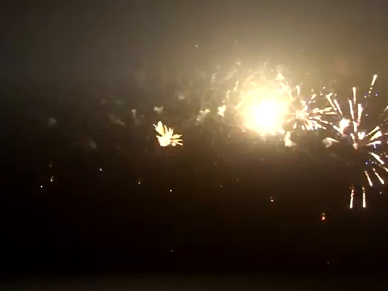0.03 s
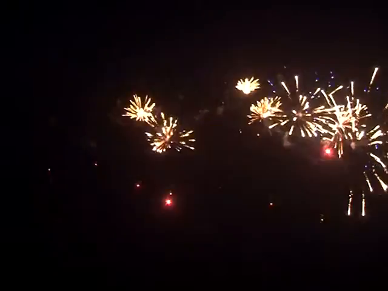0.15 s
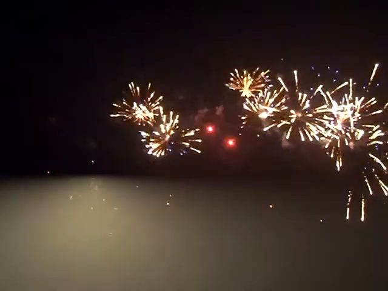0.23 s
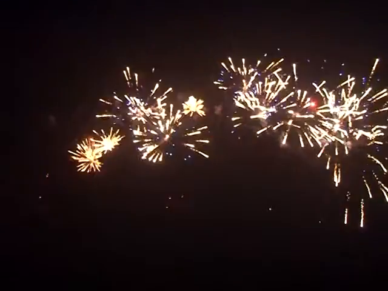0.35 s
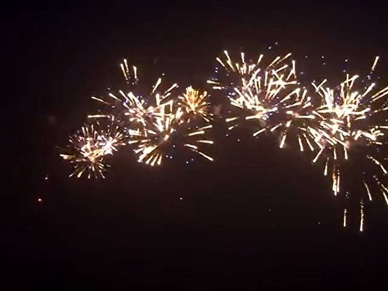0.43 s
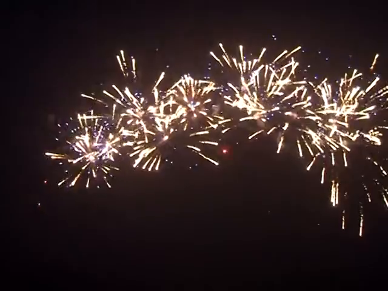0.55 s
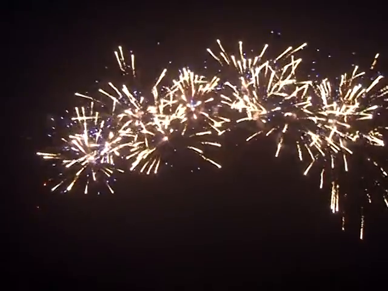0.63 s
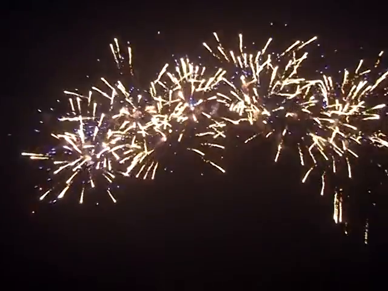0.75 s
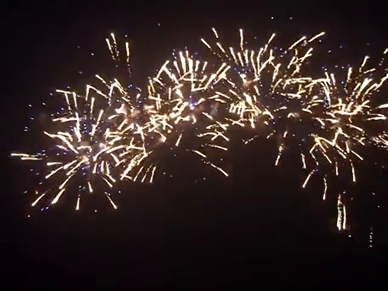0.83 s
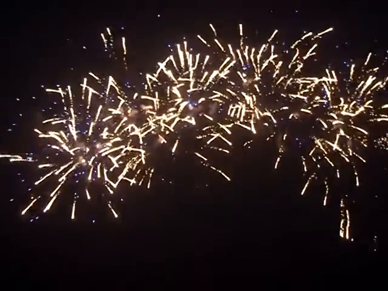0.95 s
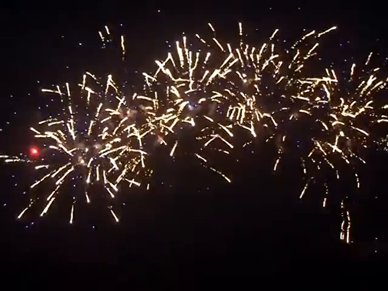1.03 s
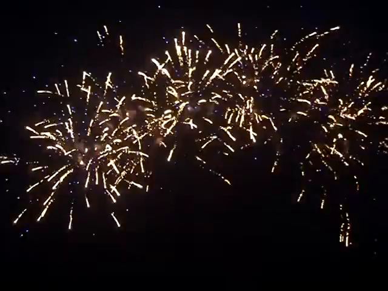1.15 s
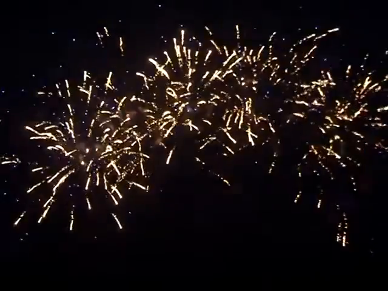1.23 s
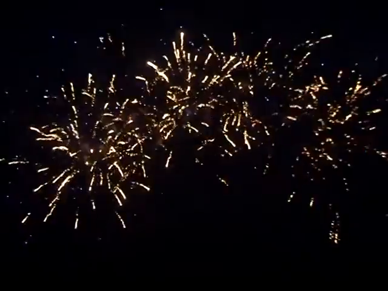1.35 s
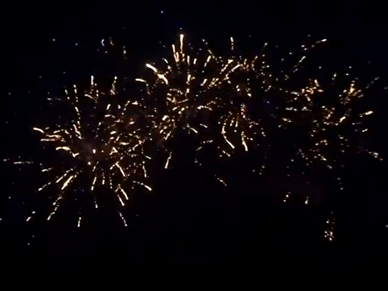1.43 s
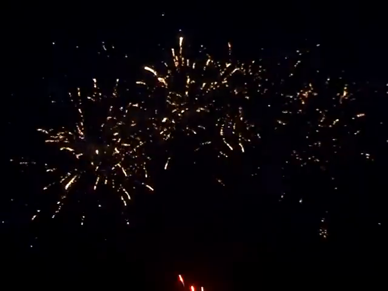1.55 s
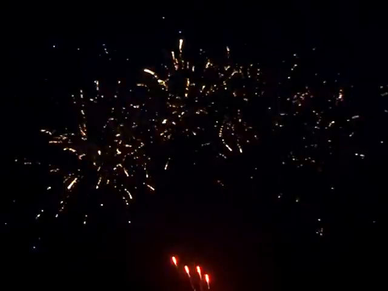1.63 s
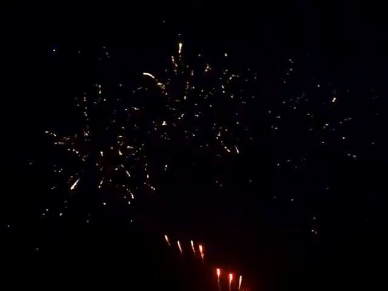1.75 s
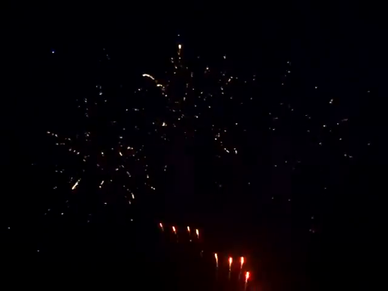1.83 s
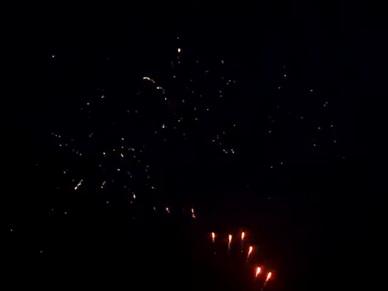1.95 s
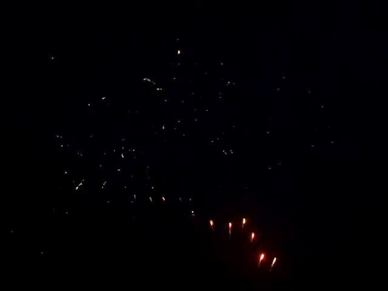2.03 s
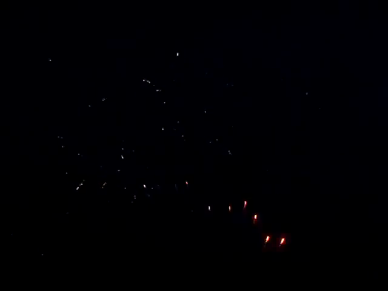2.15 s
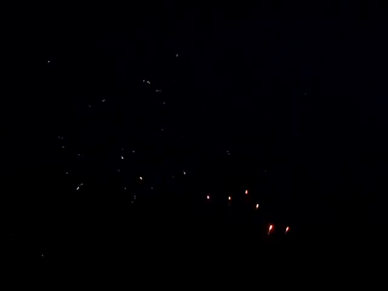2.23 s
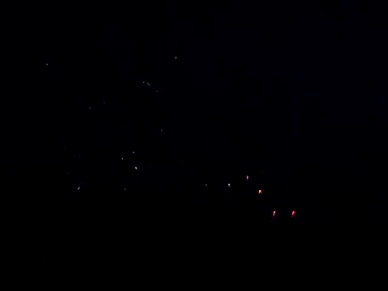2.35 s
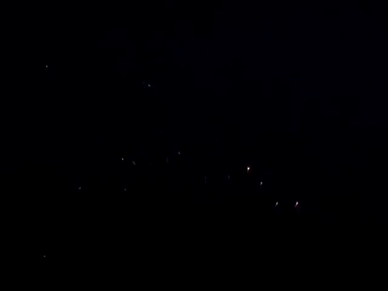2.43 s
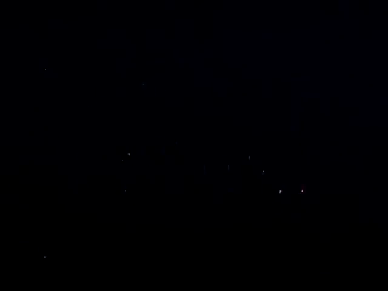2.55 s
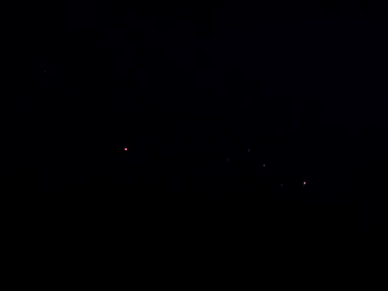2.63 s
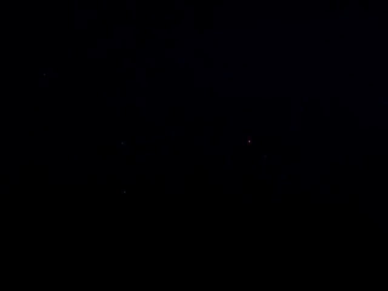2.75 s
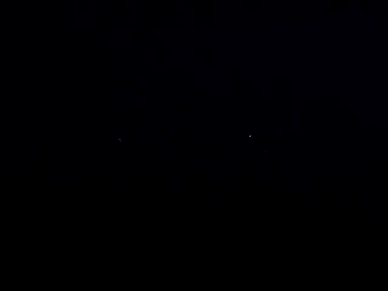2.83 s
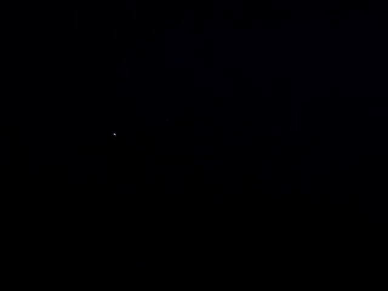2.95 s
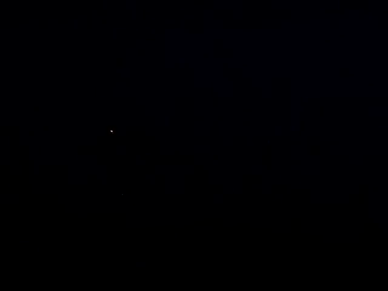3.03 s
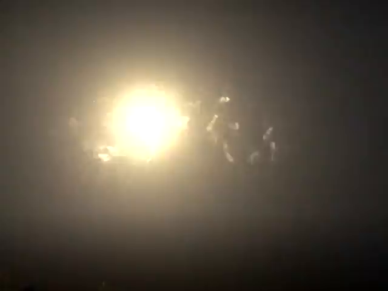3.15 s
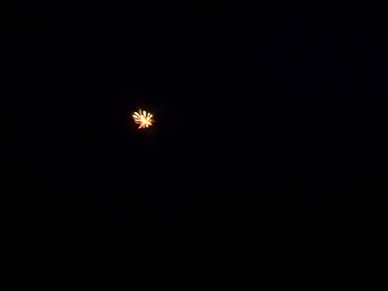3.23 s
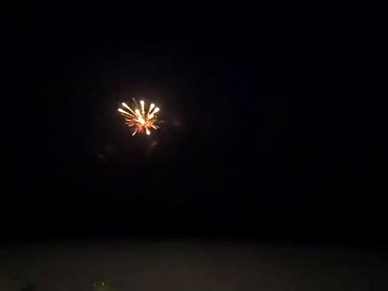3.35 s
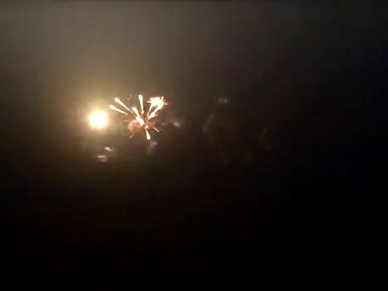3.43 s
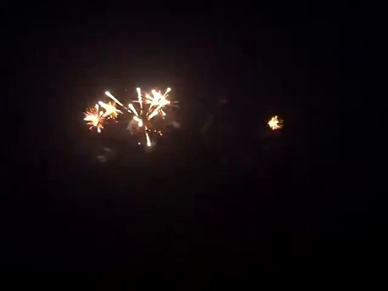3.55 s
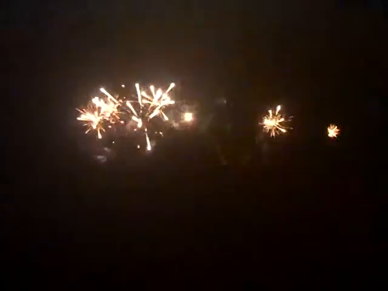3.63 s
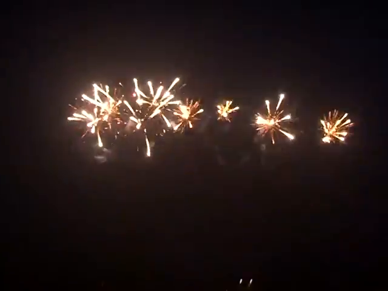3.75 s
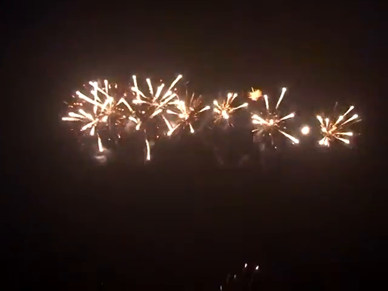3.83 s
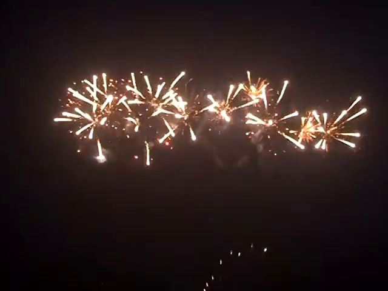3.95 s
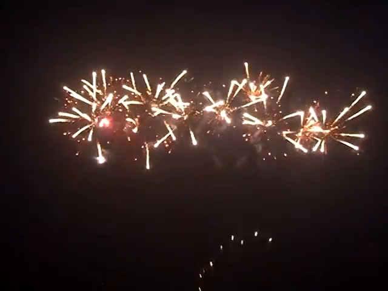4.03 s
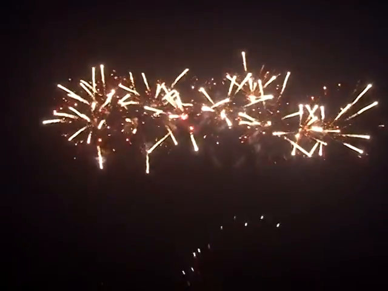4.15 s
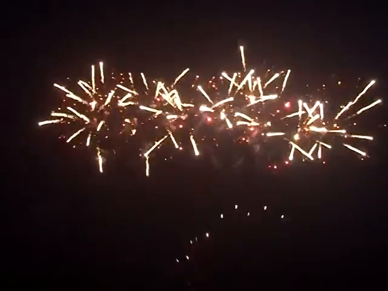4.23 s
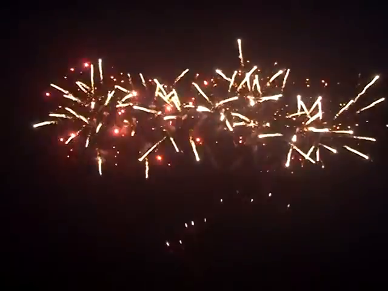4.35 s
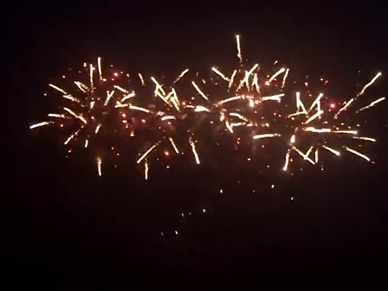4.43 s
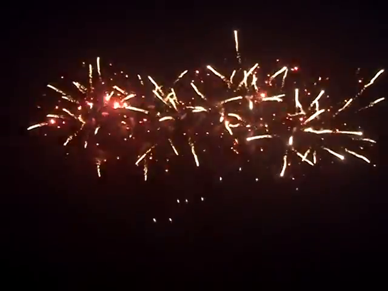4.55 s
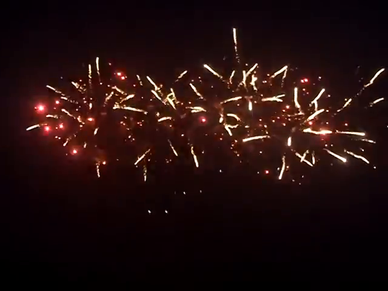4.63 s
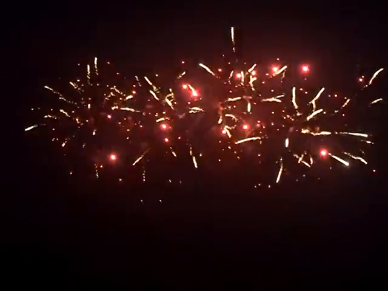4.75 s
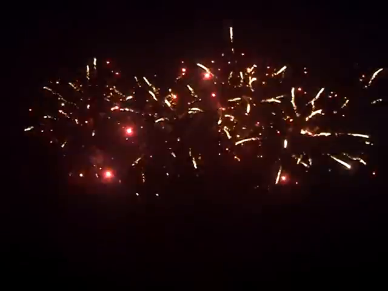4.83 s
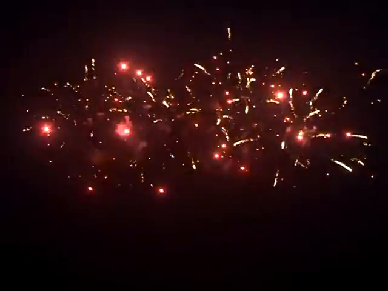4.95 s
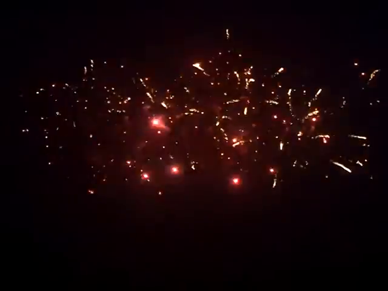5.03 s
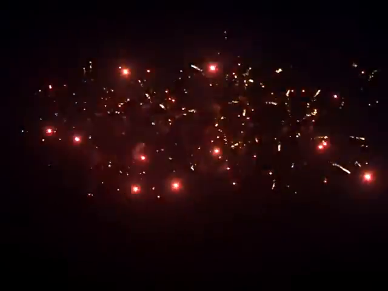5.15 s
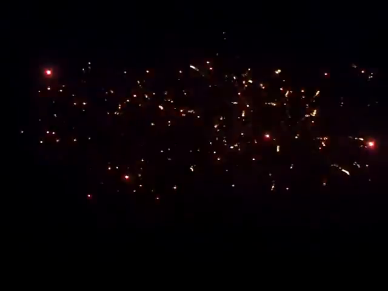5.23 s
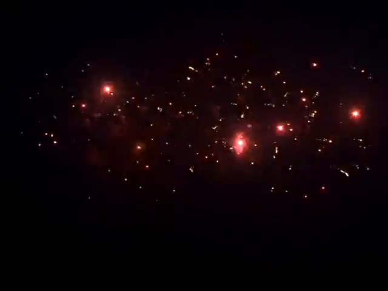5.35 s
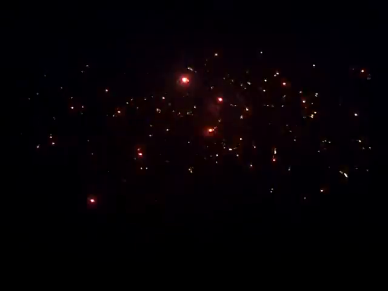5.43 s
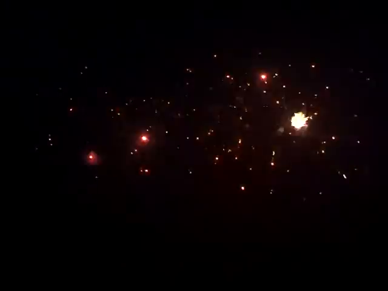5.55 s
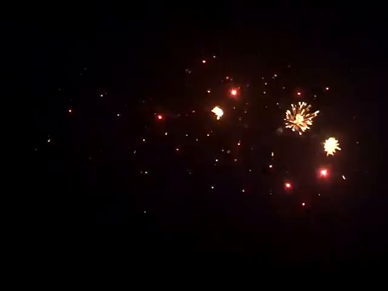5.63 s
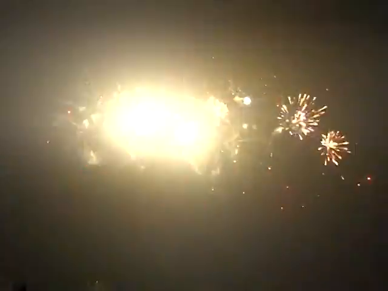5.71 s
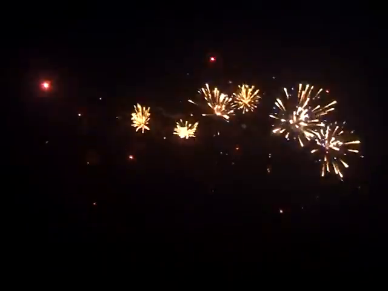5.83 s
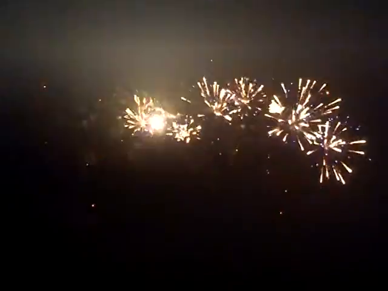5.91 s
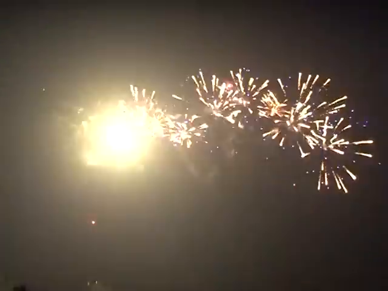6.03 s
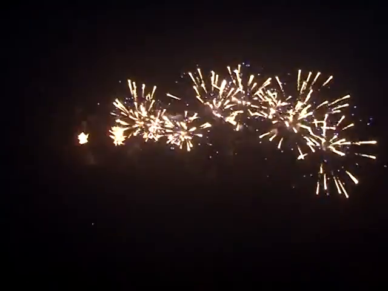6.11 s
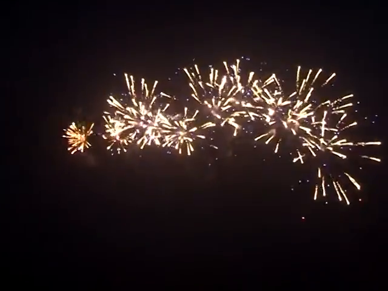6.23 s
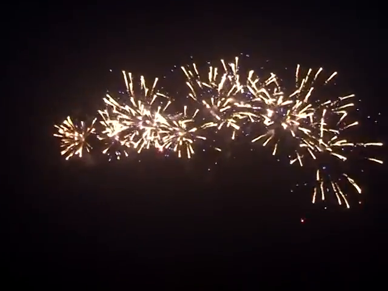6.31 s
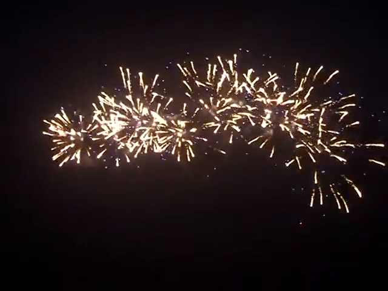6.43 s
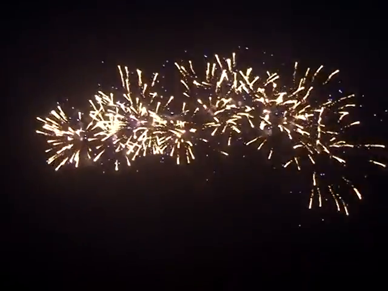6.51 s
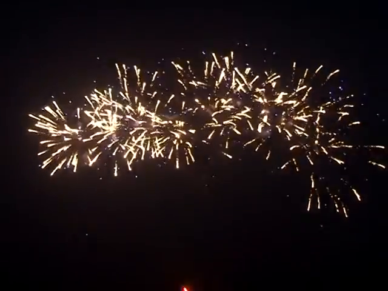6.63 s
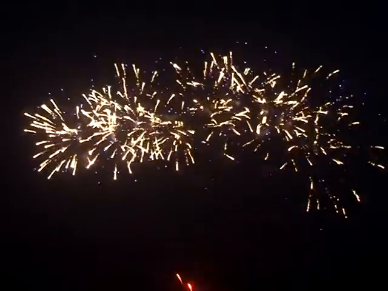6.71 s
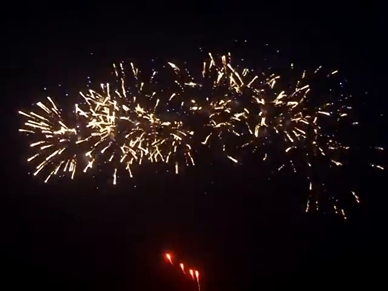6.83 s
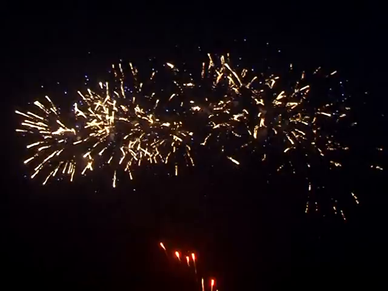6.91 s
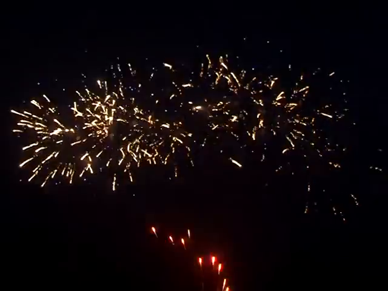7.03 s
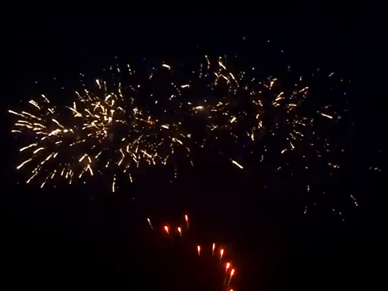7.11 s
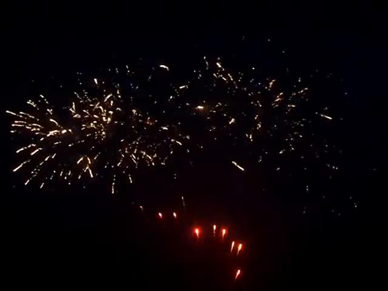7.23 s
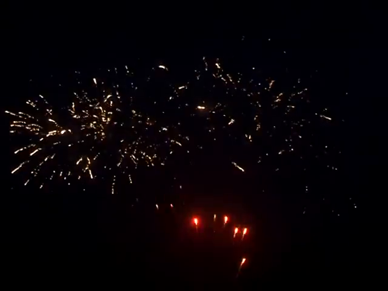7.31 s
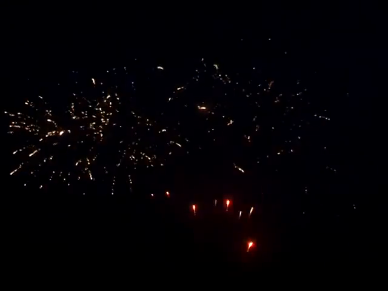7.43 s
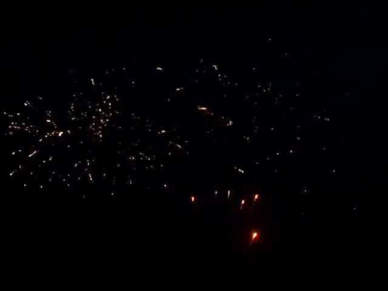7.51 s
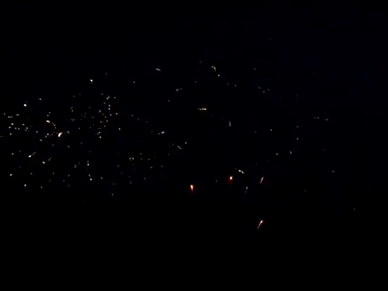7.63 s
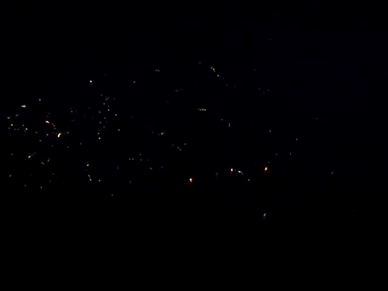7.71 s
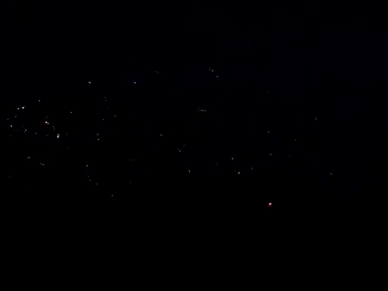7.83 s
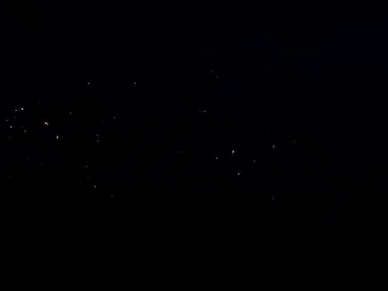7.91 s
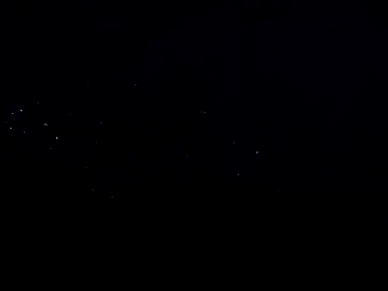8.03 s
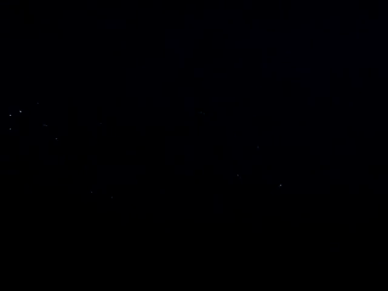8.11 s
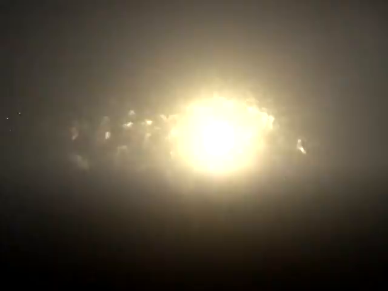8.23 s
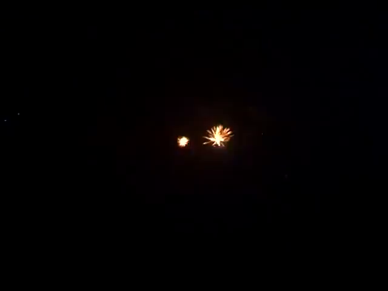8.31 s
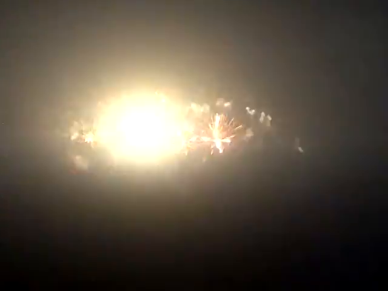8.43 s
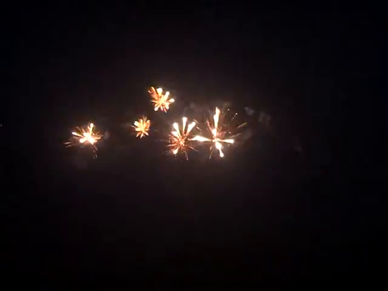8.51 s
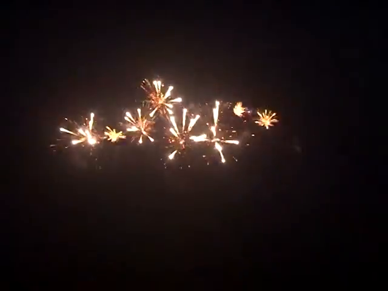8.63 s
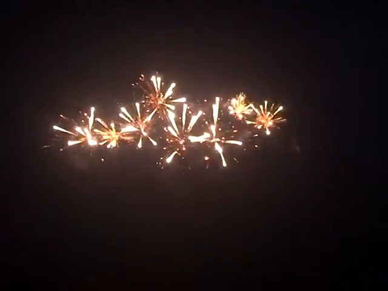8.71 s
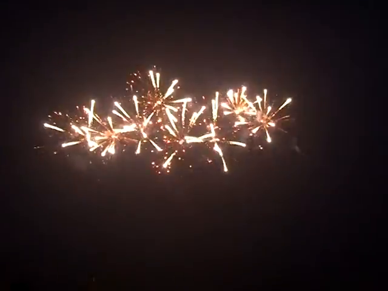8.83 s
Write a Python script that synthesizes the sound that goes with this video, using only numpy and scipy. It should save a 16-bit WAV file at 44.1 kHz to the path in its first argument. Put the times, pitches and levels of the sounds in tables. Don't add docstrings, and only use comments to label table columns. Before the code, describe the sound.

Close to a small outdoor microphone at night, a ragged volley of firework shells bangs overhead, so loud that it distorts. Echoes roll back from houses, then ten quick, duller launch thuds patter from the tubes. After a near-quiet gap, two more dense volleys crack with faint star crackle and hiss. A second row of ten thuds follows, its echoes fading into low town hum before two last bangs.

```python
import sys
import numpy as np
from scipy import signal
from scipy.fft import rfft, irfft, next_fast_len
from scipy.io import wavfile
from scipy.ndimage import map_coordinates

SR = 44100
rng = np.random.default_rng(int(sys.argv[2]) if len(sys.argv) > 2 else 0)


def store_pcm(level_fs):
    pcm = np.round(np.clip(level_fs, -1, 1) * 32767).astype(np.int16)
    wavfile.write(sys.argv[1], SR, np.atleast_2d(pcm).T)


def how_loud(loudness_db):
    steps = np.asarray(loudness_db, float) / 20
    return 10 ** steps


N = 391166

# start_s, level_db, house_echo_db, left_over_right_db
SHELL_BURSTS = [(0.0648, 14.5, -11.5, -4), (0.3796, 11.5, -5, -9.5), (0.489, 10.5, -5, 4),
                (0.5722, 10.5, -4, -4), (0.5993, 10.5, -6, 7), (.624, 7, 1, -5), (0.652, 8, -3, 17),
                (0.8118, 14.5, -10, -1), (0.8231, 11, -2, 22), (0.8342, 2, -1, 1), (3.719, 11.5, -5, 6),
                (3.9483, 13, -5.5, 7), (3.9968, 8, -13, 4), (4.056, 9.5, 0.5, 10), (4.08, 12.5, -8, 4),
                (4.1587, 17, -11, -7), (4.1793, 4, 3.5, -10), (4.2105, -3, 1, 4),
                (4.2263, 14.5, -7.5, -9.5), (4.3659, 18, -7.5, 19), (6.058, 13, -9.5, -1),
                (6.1431, 8, -0.5, -1), (6.1726, 7.5, -2.5, 5), (6.2626, 12.5, -10, -1),
                (6.2755, 7, -1.5, 26), (6.292, 6, -1.5, -6), (6.4204, 13, -9, 11), (6.478, 11, -4.5, 5),
                (6.5946, 14.5, -13, 4), (6.6499, 7, -9, -16), (8.7863, 17.5, -10.5, 6),
                (8.8373, 8.5, -2, -17)]
# near_echo_stretch (ratio), house_start_ms, long_copies_db
SHELL_PATHS = [(1, 14, -7), (1, 14, -4), (.92, 15, 0), (.9, 14, -4), (.95, 14, -1), (.92, 14, 0),
               (.92, 14, -1), (.9, 24, 0), (.95, 20, -2), (.95, 20, -3), (1.03, 15, 0), (.95, 14, 0),
               (.95, 15, 0), (1, 20, -1), (1, 14, -4), (1, 14, -5), (1, 14, -2), (1, 14, -4), (1, 14, -4),
               (1, 12, -3), (1, 14, -7), (1, 14, -5), (1, 14, -3), (1, 20, -5), (.9, 20, -2), (.95, 20, -2),
               (.95, 14, -5), (.92, 22, -2), (1, 22, -5), (.95, 22, -3), (1.05, 15, -4), (.95, 16, -3)]
# delay_ms, level_db, push_ms
NEAR_COPIES = [
    (2.2, -4, 2.15),
    (6.45, -9, 1.6),
    (9.6, -21, 2),
]


def bursts():
    out, t = np.zeros((2, N + SR)), np.arange(SR // 14) / SR
    for (start_s, db, house_db, pan_db), (stretch, house_ms, long_db) in zip(SHELL_BURSTS, SHELL_PATHS):
        near = shock(t, push_ms=.58 * stretch, rise_ms=.012)
        near = near + how_loud(-8) * shock(t - stretch * .00195, push_ms=.3, rise_ms=.04)
        near = near + how_loud(-22 - 2 * long_db) * shock(t - stretch * .005, push_ms=.4, rise_ms=.1)
        for delay_ms, level_db, push_ms in NEAR_COPIES:
            level = how_loud(level_db + long_db + rng.normal(0, 1))
            half_cycles = (1000 * t / stretch - delay_ms) / (push_ms * rng.normal(1, .08))
            near = near + level * np.sin(np.pi * np.clip(half_cycles, 0, 2))
        near = near + how_loud(-10) * grit(t - stretch * .0015, t60=.024, low_hz=500, top_hz=4000, rise_ms=.5)

        when, size, push, side = rng.random((4, 30, 1))
        facet_t = t - (house_ms + 30 * when ** 1.3) / 1000
        facets = size * how_loud(-10 * when) * shock(facet_t, push_ms=.22 + .28 * push, rise_ms=.12)
        house = np.array([np.sum(facets * how_loud(ear_db * side), axis=0) for ear_db in (-9, 1.2)])
        house = filtered(house, 1, [450, 4000], "band")
        house = house + how_loud(-11.5) * grit(t - house_ms / 1000, t60=.11, low_hz=880, top_hz=3470, rise_ms=8.9)
        add_at(out, start_s, how_loud(db) * (near * pan(pan_db) + how_loud(house_db) * house))
    return out[:, :N]


# start_s, level_db, wall_echo_db
LIFT_CHARGES = [(1.661, -0.5, -2), (1.7041, -5.5, 1.5), (1.7578, 0, -1), (1.8042, -4.5, 1.5),
                (1.856, -2, -0.5), (1.8952, -8, 6), (1.9464, -1.5, 2), (2.0054, -1.5, 2.5), (2.05, -1.5, 1),
                (2.1044, -2, 4), (6.935, 0, -25.5), (6.9769, 0.5, -5.5), (7.0324, -1, -8), (7.0982, 0, 0),
                (7.1679, -2.5, -2), (7.2029, -4, 1), (7.2611, 2, -9.5), (7.3174, -2, -7.5),
                (7.3642, -3.5, 2.5), (7.4041, -3.5, -1)]
WALL_DELAYS = np.r_[np.linspace(16.1, 14.9, 10), np.linspace(16.4, 15.4, 10)]
# pitch_hz, level_db, t60_s
TUBE_RING = [
    (3300, -17, .01),
    (4700, -14, .009),
]


def lifts():
    out, t = np.zeros((2, N + SR)), np.arange(SR // 14) / SR
    for (start_s, db, wall_db), wall_ms in zip(LIFT_CHARGES, WALL_DELAYS):
        direct = (0, db - 0.5, .03, -14)
        reflected = (wall_ms / 1000, db + wall_db, .12, -11)
        for delay_s, level_db, rise_ms, fizz_db in (direct, reflected):
            u = np.maximum(t - delay_s, 0)
            crack = shock(u, push_ms=.5, rise_ms=rise_ms)
            crack = crack + how_loud(-3) * shock(u - .00062, push_ms=.6, rise_ms=rise_ms)
            crack = crack + how_loud(-18) * shock(u - .003, push_ms=1.2, rise_ms=.4)
            ring = 0
            for hz, ring_db, t60 in TUBE_RING:
                decay = how_loud(ring_db + rng.normal(0, 2.9) - 60 * u / t60)
                ring = ring + decay * np.sin(2 * np.pi * hz * rng.normal(1, 0.15) * u)
            shove = how_loud(-3.5) * np.sin(2 * np.pi * 65 * u) * how_loud(-60 * u / 0.033)
            shove = shove + how_loud(-18.5) * np.sin(2 * np.pi * 120 * u) * how_loud(-60 * u / 0.095)
            fizz = how_loud(fizz_db) * grit(t - delay_s, t60=0.023, low_hz=980, top_hz=6100, rise_ms=0.23)
            add_at(out, start_s, how_loud(level_db) * (crack + ring + shove + fizz))
    return filtered(out[:, :N], 2, 8500, "low")


# start_s, level_db, pitch_hz, left_over_right_db
STAR_CRACKS = [(0.4474, -25, 3830, -1.0), (0.9916, -23, 3060, 1.0), (1.0833, -17.5, 3040, 6),
               (1.1894, -21, 3020, -0.5), (2.7494, -38, 3070, -0.5), (2.7801, -43, 3320, -0.5),
               (2.8345, -38.5, 3400, -1.0), (4.0317, -18, 5170, 0), (4.1124, -17, 3460, -0.5),
               (4.344, -27, 3080, 5), (4.443, -19.5, 3590, 0.5), (5.047, -29, 2980, 7),
               (6.755, -26, 3320, 3), (6.83, -23.5, 4720, 5)]


def snaps():
    out, t = np.zeros((2, N + SR)), np.arange(SR // 40) / SR
    for start_s, db, hz, pan_db in STAR_CRACKS:
        crack = grit(t, t60=0.036, low_hz=0.36 * hz, top_hz=1.2 * hz, rise_ms=.15)
        add_at(out, start_s, how_loud(db + 8.5) * crack * pan(pan_db))
    return out[:, :N]


def shock(t, push_ms, rise_ms, suction=2.088):
    u = np.maximum(t, 0) * 1000 / push_ms
    rise = -np.expm1(-u * push_ms / rise_ms)
    return rise * (1 - u ** 1.5) * np.exp(-(u / suction) ** 2)


def grit(t, t60, low_hz, top_hz, rise_ms):
    a, b = rng.standard_normal((2, len(t)))
    splash = filtered([a + 0.3 * b, a - 0.75 * b], 2, [low_hz, top_hz], "band")
    u = np.maximum(t, 0)
    return splash * how_loud(-60 * u / t60) * -np.expm1(-1000 * u / rise_ms)


# pitch_hz, t60_s
YARD_DECAY = [(100, 0.41), (500, 0.59), (3000, 0.087), (10000, 0.17)]


def yard(x, step):
    out = np.zeros((2, N + SR))
    for start in range(0, N, step):
        part = x[start:start + step]
        if np.abs(part).max() <= 1e-3:
            continue
        hz, t, z = signal.stft(rng.standard_normal((2, SR // 2)), SR, nperseg=256)
        decay = how_loud(-60 * t / along(YARD_DECAY, hz)[:, None])
        mid, side = signal.istft(z * decay, SR, nperseg=256)[1]
        side = filtered(side, 1, 700, "high")
        tail = np.array([mid + .7 * side, mid - 0.35 * side]) / np.linalg.norm(mid)
        wet = signal.fftconvolve(part[None], tail, axes=1)
        out[:, start + 500:][:, :wet.shape[1]] += wet
    return out[:, :N]


# start_s, body_db, bright_db, thump_db, hiss_db
FAR_LEVELS = [
    [(0.0, -35, -49, -55, -60), (0.06, -42, -52, -48, -66)],
    [(0.07, -35, -47, -51, -66), (0.122, -22, -31.5, -48, -47), (0.24, -24, -32.5, -36, -46),
     (0.372, -23.5, -31, -41, -45)],
    [(0.385, -7, -35, -45, -53), (0.431, -19, -30, -46, -45), (0.541, -16, -28.5, -52, -47),
     (0.703, -15, -28, -24, -42), (0.805, -24.5, -30, -47, -45)],
    [(0.82, -17, -31, -41, -44), (1.052, -17.5, -25.5, -33.5, -43), (1.188, -15, -27, -41, -47),
     (1.348, -24.5, -33.5, -59, -66), (1.448, -27.5, -36.5, -55, -75), (1.655, -28, -41.5, -38, -68)],
    [(1.67, -20, -29, -49, -66), (1.72, -28, -32, -39, -59), (1.82, -17.5, -29, -19, -45),
     (1.84, -24.5, -31, -44, -47), (1.93, -24, -31, -33, -50), (2.0, -25, -30.5, -21, -48),
     (2.06, -21.5, -28, -30, -53), (2.14, -21, -30.5, -28, -52), (2.23, -29.5, -35.5, -42, -58),
     (2.47, -36, -44, -53, -60), (2.67, -40, -46.5, -57, -82), (2.89, -61, -53, -58, -81),
     (3.28, -57, -63, -50, -73), (3.5, -65, -57, -56, -76), (3.71, -61, -55, -56, -73)],
    [(3.725, -37, -51, -56, -75), (3.773, -20, -31.5, -52, -47), (3.891, -22, -32, -38, -45),
     (3.942, -21.5, -27, -31, -44)],
    [(3.96, -13, -28, -42, -47), (4.0, -12.5, -26, -42, -48), (4.1, -15.5, -25, -37, -35),
     (4.16, -14, -24.5, -24, -48), (4.26, -13.5, -25.5, -32, -37), (4.38, -17, -28, -33, -46),
     (4.48, -21.5, -31, -41, -46), (4.62, -20, -28, -41, -43), (4.74, -18, -27, -40, -50),
     (4.88, -22, -32.5, -41, -53), (5.02, -25.5, -34.5, -54, -70), (5.16, -29.5, -39, -54, -61),
     (5.65, -31, -45, -43, -60), (5.82, -31.5, -47.5, -48, -62), (6.05, -43, -50, -52, -61)],
    [(6.065, -31, -49, -52, -66), (6.107, -19, -31, -45, -65), (6.227, -16.5, -29, -37, -46),
     (6.315, -15.5, -28, -52, -41), (6.701, -18.5, -28.5, -35, -45), (6.8, -18, -26.5, -41, -42)],
    [(6.82, -15.5, -23.5, -38, -45), (6.93, -14.5, -27, -34, -47)],
    [(6.94, -14, -25, -43, -41), (6.986, -18.5, -28.5, -29, -45), (7.104, -22.5, -30, -25, -52),
     (7.206, -19.5, -29.5, -23, -48), (7.282, -22, -27, -22, -53), (7.37, -19.5, -30, -24, -49),
     (7.508, -26, -33.5, -33, -55), (7.596, -28.5, -37.5, -44, -64), (7.892, -34, -45, -51, -76),
     (8.19, -38.5, -53.5, -51, -83), (8.512, -43.5, -55.5, -54, -74), (8.78, -45, -54, -55, -73)],
    [(8.79, -43, -54, -54, -73), (8.87, -49, -52, -53, -73)],
]
# pitch_hz, level_db
BODY_SPECTRUM = [(53, -32), (90, -15.5), (188, -3.5), (388, 1.5), (526, -0.5), (695, -6.5), (944, -7),
                 (1300, -12.5), (2500, -23), (3250, -54), (5500, -120)]
# pitch_hz, level_db
BRIGHT_SPECTRUM = [(880, -44), (1500, 0), (2790, -5), (3340, -8.5), (4650, -10), (7500, -23.5), (9750, -37),
                   (16500, -120)]
# pitch_hz, level_db
THUMP_SPECTRUM = [(12, -69), (20, -29), (54, -20), (91, -16), (124, -13), (150, -15), (200, -46),
                  (330, -120)]
# pitch_hz, level_db
HISS_SPECTRUM = [(4120, -14), (7000, -4.5), (10400, -16), (12600, -32), (13200, -58), (14000, -83)]
# pitch_hz, level_db
NIGHT_SPECTRUM = [(15, -54), (25, -28), (54, -5), (75, -2.5), (93, -14.5), (272, -0.5), (702, -7),
                  (862, -14), (1200, -9), (1370, -20), (1720, -8.5), (2120, -19), (3190, -20), (4120, -31),
                  (11500, -48.5), (15000, -75), (22000, -120)]


def roll():
    start_s, *levels_db = np.concatenate(FAR_LEVELS).T
    t = np.arange(N) / SR
    body, bright, thump, hiss = (how_loud(np.interp(t, start_s, db)) for db in levels_db)
    lumps_db = map_coordinates(rng.standard_normal(int(N * 28 / SR) + 4), [np.arange(N) * 28 / SR])
    body = body * how_loud(1.2 * lumps_db)
    bright = bright * how_loud(.6 * lumps_db)
    far = body * scatter(BODY_SPECTRUM, per_second=450, spread_db=6, smooth=1.)
    far = far + bright * scatter(BRIGHT_SPECTRUM, per_second=2500, spread_db=6, smooth=1.4)
    far = far + thump * scatter(THUMP_SPECTRUM, per_second=100, spread_db=-12.5, smooth=1.4)
    far = far + hiss * scatter(HISS_SPECTRUM, per_second=3000, spread_db=4, smooth=1.5)
    night = how_loud(-40) * scatter(NIGHT_SPECTRUM, per_second=980, spread_db=-7.5, smooth=1.05)
    return far * pan(-.8) + night * pan(-1.6)


# pitch_hz, likeness (0 to 1)
EAR_LIKENESS = [(60, 0.88), (180, 0.97), (540, 0.85), (1640, 0.36), (4930, 0.57), (14900, 0.63)]


def scatter(spectrum, per_second, spread_db, smooth):
    sizes = how_loud(spread_db * rng.uniform(-0.41, 1, (2, N)))
    hits = (rng.random((2, N)) < per_second / SR) * sizes
    pair = unit(hits * np.sign(rng.standard_normal((2, N)))) + smooth * rng.standard_normal((2, N))
    m = next_fast_len(N + 8192)
    hz = np.fft.rfftfreq(m, 1 / SR)
    turn = np.arccos(np.clip(along(EAR_LIKENESS, hz), -1, 1)) / 2
    shares = [np.cos(turn), np.sin(turn)]
    mid, side = irfft(rfft(pair, m) * how_loud(along(spectrum, hz)) * shares, m)[:, :N]
    return unit(np.array([mid + side, mid - side]))


def unit(x):
    return x / np.sqrt(np.mean(x ** 2) + 1e-20)


def along(points, hz):
    f, v = np.transpose(points)
    return np.interp(np.log(hz + 1), np.log(f + 1), v)


def filtered(x, order, hz, kind):
    return signal.lfilter(*signal.butter(order, hz, kind, fs=SR), x)


def pan(left_over_right_db):
    return how_loud([[left_over_right_db / 2], [-left_over_right_db / 2]])


def add_at(out, start_s, sound):
    out[:, round(start_s * SR):][:, :sound.shape[1]] += sound


def scene():
    shells, charges = bursts(), lifts()
    shell_send = how_loud(-21.5) * filtered(shells.mean(axis=0), 1, 350, "high")
    charge_send = how_loud(-13.5) * charges.mean(axis=0)
    echoes = yard(shell_send, step=SR // 2) + yard(charge_send, step=N)
    return shells + charges + echoes + snaps() + roll()


def band_limit(x):
    return signal.sosfilt(signal.butter(12, 15460, fs=SR, output="sos"), x)


# start_s, level_db
INPUT_CEILING = [(0, 0), (.5, 0), (.56, -2.5), (.6, -3.5), (.7, -3.5), (.815, -1), (.835, -4), (1.5, 0),
                 (3.96, 0), (3.99, -3.5), (4.3, -3.5), (4.365, -2), (4.4, -3.5), (5.3, 0), (6.07, 0),
                 (6.13, -3), (6.34, -3), (6.42, -2), (6.47, -3.5), (6.59, -1.5), (6.64, -3.5), (6.9, 0),
                 (8.8, 0), (8.83, -5)]
# pitch_hz, level_db
MIC_RESPONSE = [(20, -2), (6000, 0), (9000, 0), (12000, -3.5), (13500, -6), (14500, -16), (15400, -26),
                (16000, -47)]


def record(dry):
    top = 0.94 * how_loud(np.interp(np.arange(N) / SR, *np.transpose(INPUT_CEILING)))
    x = dry / (1 + np.abs(dry / top) ** 6) ** (1 / 6)
    x = filtered(x, 2, 40, "high")
    m = next_fast_len(N + 8192)
    response = how_loud(along(MIC_RESPONSE, np.fft.rfftfreq(m, 1 / SR)))
    x = irfft(rfft(x, m) * response, m)[:, :N]
    return band_limit(np.clip(x, -1, 1))


dry = scene()
out = record(dry)
store_pcm(out)
```